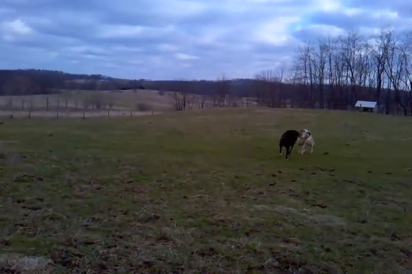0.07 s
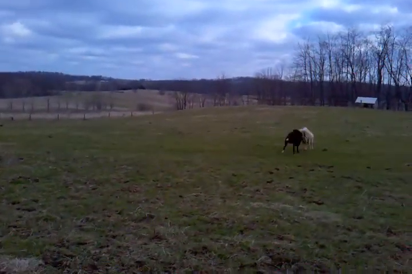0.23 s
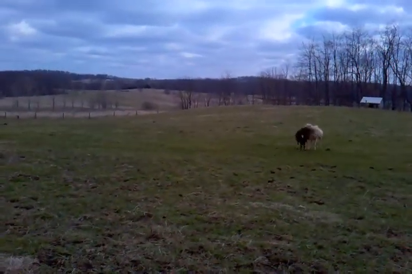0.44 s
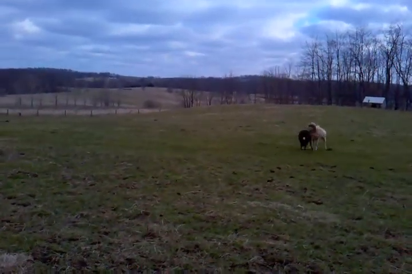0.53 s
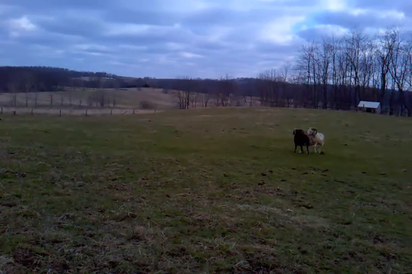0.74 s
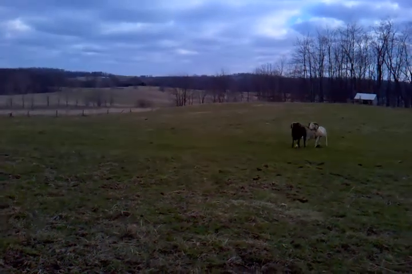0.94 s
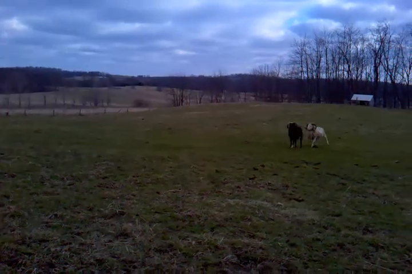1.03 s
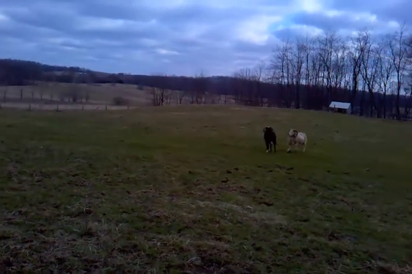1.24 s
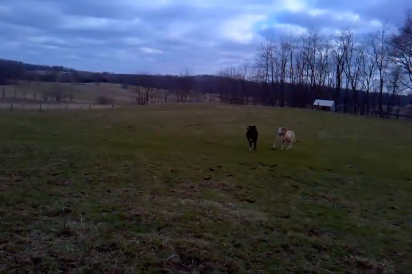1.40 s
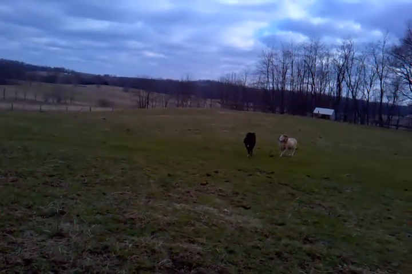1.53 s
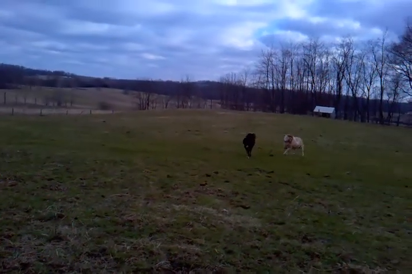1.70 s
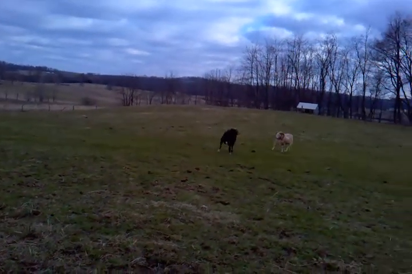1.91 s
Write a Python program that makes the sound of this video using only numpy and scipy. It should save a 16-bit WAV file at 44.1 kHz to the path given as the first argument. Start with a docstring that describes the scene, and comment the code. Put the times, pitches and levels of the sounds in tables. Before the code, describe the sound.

Two sheep butt heads with one short, low, bony knock that echoes faintly across an open pasture. Close to the microphone, grass and clothing rustle and dry stalks snap softly, then settle into light wind.

```python
"""An open pasture where two sheep butt heads: a few quick contacts ring the skulls in one short, low,
bony knock, which the field smears and a far tree line throws back. Close by, dry grass and clothing
rustle, feet scuff the turf and stalks snap. A distant bird whistles twice. Light wind hisses
throughout, over the faint fluttering buzz of a current switching in the camera's electronics."""
import sys
import numpy as np
from scipy import signal
from scipy.fft import rfft, irfft
from scipy.io import wavfile
from scipy.ndimage import uniform_filter1d

SR = 44100
rng = np.random.default_rng(int(sys.argv[2]) if len(sys.argv) > 2 else 0)


def to_wav(s):
    """Save 16-bit WAV."""
    ch = np.atleast_2d(s).T  # columns
    pcm = np.round(np.clip(ch, -1, 1) * 32767)  # PCM
    wavfile.write(sys.argv[1], SR, pcm.astype(np.int16))


N = 85995


def undb(db):
    """Decibels to amplitude."""
    return 10 ** (np.asarray(db) / 20)


def unit(x):
    """Scale to rms 1."""
    return x / np.sqrt(np.mean(x ** 2))


def noise():
    """White noise, the length of the scene."""
    return rng.standard_normal(N)


def since(start):
    """Seconds since start, zero before it."""
    return np.maximum(np.arange(N) / SR - start, 0)


def fade(t, t60):
    """Exponential decay, 60 dB down at t60."""
    return np.exp(-np.log(1000) * t / t60)


def colour(x, points):
    """EQ x along a curve of (freq_hz, gain_db) points, then scale to rms 1."""
    hz, db = np.array(points, float).T
    bin_hz = np.maximum(np.arange(N // 2 + 1) * SR / N, 1)
    gain = undb(np.interp(np.log(bin_hz), np.log(hz), db))
    return unit(irfft(rfft(x) * gain, N))


def band(x, hz, q):
    """Two-pole band-pass, gain 1 at the centre."""
    return signal.lfilter(*signal.iirpeak(hz, q, fs=SR), x)


def drift(rate_hz):
    """Smooth random wander at rms 1."""
    hold = int(SR / rate_hz)
    steps = np.repeat(noise()[:N // hold + 1], hold)
    return unit(uniform_filter1d(uniform_filter1d(steps, hold), hold)[:N])


def noise_bursts(rows, q):
    """Bursts of band-passed noise, each with a linear attack and an exponential tail."""
    out = 0
    for start, db, attack, t60, hz in rows:
        envelope = np.minimum(since(start) / attack, 1) * fade(since(start + attack), t60)
        texture = unit(band(band(noise(), hz, q), hz, q))
        out = out + undb(db) * envelope * texture
    return out


def wind():
    """A soft, steady bed of air over the field, with very slight gusts."""
    # tone of the wind: freq_hz, gain_db
    air_eq = [(25, -19), (50, -6), (80, 0), (140, 6.5), (260, 4.5), (450, -1), (800, -2.5), (1400, -1.5),
              (2200, -7), (4000, -11), (6500, -14.5), (7400, -24.5)]
    level_db, gust_db = -65.5, .3
    return undb(level_db + gust_db * drift(rate_hz=3.6)) * colour(noise(), air_eq)


def electronics_buzz():
    """A current in the camera switches on and off; both edges make a soft low pulse."""
    # partials of the buzz: harmonic_number, relative_db
    partials = [(3, -15.5), (4, -13), (5, 1), (6, -4.5), (7, -14.5), (8, -6.5), (9, -1.5), (10, -13.5),
                (11, -13), (12, -10.5), (13, -19), (14, -40.5)]
    rate_hz, switch_on_s, duty = 29.48, .0287, .283
    level_db, off_edge_strength = -63, .99
    cycle_phase = 2 * np.pi * rate_hz * (np.arange(N) / SR - switch_on_s)
    out = 0
    for harmonic, db in partials:
        # the two opposite edges set each partial's phase
        edges = 1 - off_edge_strength * np.exp(-2j * np.pi * harmonic * duty)
        out = out + undb(level_db + db) * np.sin(harmonic * cycle_phase + np.angle(edges))
    return out


def rustle():
    """Grass and clothing rub: dense tiny clicks and hiss that swell with each movement."""
    # swells of movement: time_s, level_db
    swells = [(0, -59), (0.065, -53.5), (.088, -47), (0.097, -51.5), (.112, -47.5), (.12, -51),
              (0.185, -55), (.21, -45), (.243, -45), (0.274, -47.5), (0.335, -49.5), (.38, -46.5),
              (.425, -52), (.51, -54), (0.562, -56.5), (0.727, -64.5), (.868, -64.5), (.97, -72),
              (1.1, -71.5), (1.29, -74), (1.33, -64), (1.357, -55.5), (1.378, -54.5), (1.411, -62),
              (1.52, -68), (1.68, -73.5), (1.764, -67.5), (1.83, -66.5), (1.95, -64)]
    # tone of the rubbing: freq_hz, gain_db
    rub_eq = [(100, -10.5), (350, -11.5), (800, -4), (1400, -6), (2200, -5.5), (3500, 0), (4400, -2),
              (5200, 0.5), (6700, 4), (7300, -10), (9000, -10)]
    grains_per_s, grain_spread_db, grain_share = 2500, 3.5, .57
    trim_db, flicker_db = -1, 1.0
    clicks = (rng.random(N) < grains_per_s / SR) * np.sign(noise())
    grains = clicks * undb(grain_spread_db * np.minimum(rng.exponential(size=N), 4))
    rub = np.sqrt(grain_share) * unit(grains) + np.sqrt(1 - grain_share) * noise()
    swell_db = np.interp(since(0), *np.array(swells).T)
    return undb(trim_db + swell_db + flicker_db * drift(rate_hz=90)) * colour(rub, rub_eq)


def footwork():
    """Feet shift on soft turf and brush the grass."""
    # dull scuffs and treads: start_s, level_db, attack_s, t60_s, centre_hz
    scuffs = [(.2, -61, 0.014, 0.13, 870), (.607, -60, 0.01, 0.13, 187), (1.106, -55, .004, 0.027, 155),
              (1.335, -64, 0.02, .2, 1040), (1.423, -60.5, 0.0038, 0.033, 900)]
    # light brushes of dry grass: start_s, level_db, attack_s, t60_s, centre_hz
    brushes = [(.035, -49, 0.063, 0.058, 5800), (.198, -53.5, 0.022, 0.31, 3660),
               (1.34, -61.5, 0.032, 0.071, 3930), (1.75, -63.5, 0.023, .13, 5800)]
    return noise_bursts(scuffs, q=1.26) + noise_bursts(brushes, q=3.6)


def stalk_snaps():
    """Dry stalks break in short, bright bursts."""
    # breaking stalks: start_s, level_db, length_s
    snaps = [(0.102, -34.5, 0.0047), (0.2537, -39, 0.0039), (0.308, -39.5, 0.0016), (0.382, -43, .004),
             (.4983, -48, 0.0041), (0.568, -43.5, 0.00076), (.679, -54.5, 0.012), (1.044, -54, 0.0036),
             (1.108, -63, .003), (1.737, -58, 0.0046)]
    # tone of a snap: freq_hz, gain_db
    snap_eq = [(500, -17.5), (1800, -18), (2600, -0.5), (4000, -8.5), (5000, 2.5), (6600, 2.5),
               (7100, -8.5), (8000, -5.5)]
    gate = 0
    for start, db, length in snaps:
        t = since(start)
        gate = gate + undb(db) * (t > 0) * np.exp(-(t / length) ** 4)  # holds, then shuts fast
    return gate * colour(noise(), snap_eq)


def head_knock():
    """Quick contacts, soft and hard, ring the skulls; a brief crack rides on top."""
    # pushes of skull on skull: start_s, gain_db, centre_hz, q
    contacts = [(.44007, -13.5, 571, 2.4), (.44018, -35, 1610, .5), (.44351, -18.3, 1707, 4.1),
                (.44568, -12.6, 1064, 4), (.45309, -33.6, 305, 2.1)]
    # ringing modes of the heads: pitch_hz, relative_db, t60_s
    skull_modes = [(228, -6.5, .066), (260, -3.6, .08), (358, -2.5, .033), (443, -13.2, .08),
                   (674, -18.5, .075), (1008, -22.3, .027), (1320, -26.5, .065), (1526, -14.2, .016),
                   (1847, -3.6, .002), (2033, -11.6, .021), (2509, -13.5, .027), (4220, 3.8, .004)]
    # tone of the crack: freq_hz, gain_db
    crack_eq = [(150, -15), (600, 4), (2200, 3.5), (3100, 1.5), (4300, 1), (5600, -4.5), (7000, -4),
                (9000, -36)]
    ring_trim_db, crack_db, crack_t60_s = -.4, -43.5, .082
    body = 0
    for start, gain_db, centre_hz, q in contacts:
        t = since(start)
        ring = sum(undb(db) * np.sin(2 * np.pi * hz * t) * fade(t, t60) for hz, db, t60 in skull_modes)
        body = body + undb(ring_trim_db + gain_db) * band(ring, centre_hz, q)
    t = since(contacts[0][0])
    crack = undb(crack_db) * colour(noise(), crack_eq) * (t > 0) * fade(t, crack_t60_s)
    return body + crack


def field_echoes(knock):
    """Ground and slope scatter a dull tail; far trees return one thin slapback of the knock."""
    # washes of scattered sound: start_s, level_db, attack_s, t60_s, centre_hz
    scatter = [(.452, -51, 0.005, 0.33, 468), (.494, -53, 0.013, .11, 1230), (.52, -64, 0.029, 0.64, 746),
               (.78, -62, 0.013, 0.59, 870)]
    trees_delay_s, trees_gain_db = .3372, -18
    delayed = np.interp(np.arange(N) - trees_delay_s * SR, np.arange(N), knock, left=0)
    slapback = undb(trees_gain_db) * band(delayed, hz=1050, q=1.2)
    return noise_bursts(scatter, q=.95) + slapback


def distant_bird():
    """Two whistles that rise and sag, blurred by distance."""
    # far calls: start_s, level_db
    calls = [(1.105, -66), (1.607, -67)]
    # contour of one call: elapsed_s, pitch_hz, relative_db
    contour = [(0, 1400, -5), (.018, 1628, 1), (.045, 1672, -3), (.07, 1617, -8), (.1, 1610, -7),
               (.16, 1580, -19)]
    elapsed_s, pitch_hz, relative_db = np.array(contour, float).T
    waver = .0199  # fraction of the pitch; this fast jitter is the blur
    out = 0
    for start, level_db in calls:
        t = since(start)
        pitch = np.interp(t, elapsed_s, pitch_hz) * (1 + waver * drift(rate_hz=400))
        gate = (t > 0) * (t < elapsed_s[-1])
        envelope = undb(level_db + np.interp(t, elapsed_s, relative_db)) * gate
        out = out + envelope * np.sin(2 * np.pi * np.cumsum(pitch) / SR)
    return out


def scene():
    """The knock, its echoes, the close movement and the ambience, mixed to mono."""
    knock = head_knock()
    action = knock + field_echoes(knock) + footwork() + rustle() + stalk_snaps()
    return (action + wind() + distant_bird() + electronics_buzz())[None]


def record(dry):
    """The camera thins the deep bass and cuts the top."""
    low_cut_hz, high_cut_hz = 86, 7350
    low_cut = signal.butter(3, low_cut_hz, "high", fs=SR, output="sos")
    high_cut = signal.ellip(8, .3, 60, high_cut_hz, fs=SR, output="sos")
    return signal.sosfilt(high_cut, signal.sosfilt(low_cut, dry))


dry = scene()
out = record(dry)
to_wav(out)
```